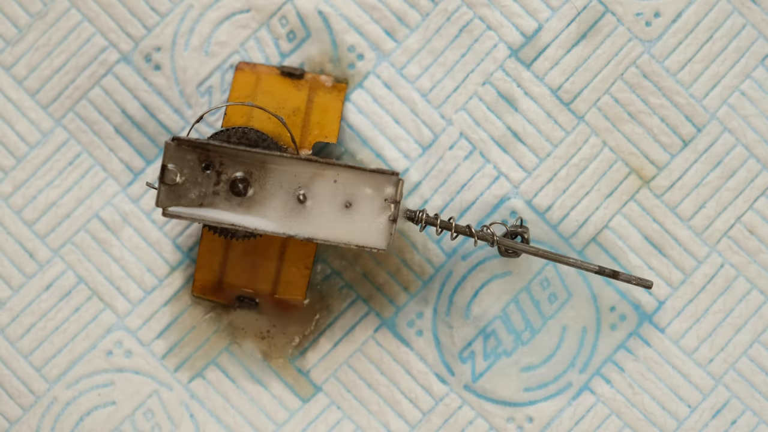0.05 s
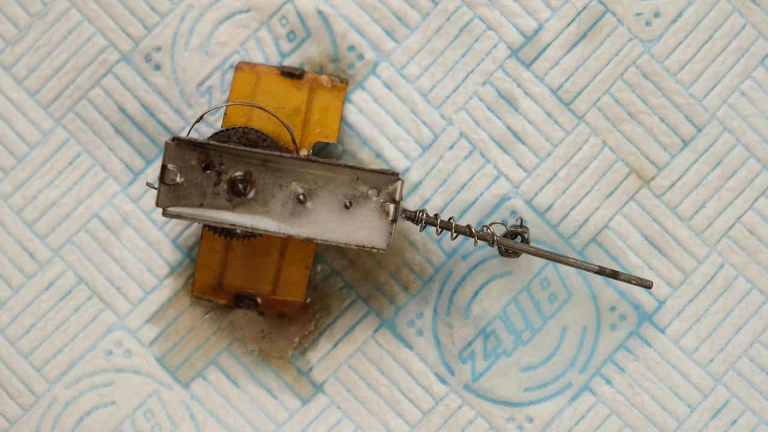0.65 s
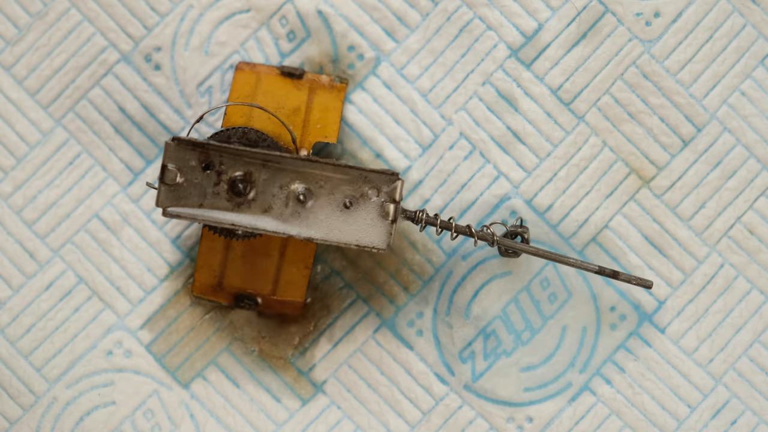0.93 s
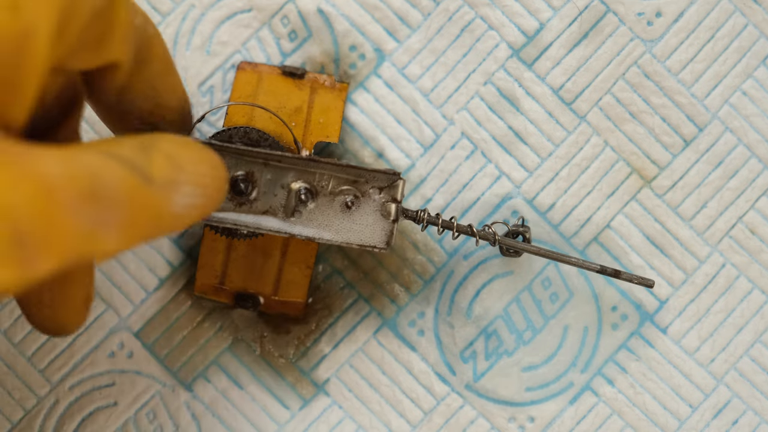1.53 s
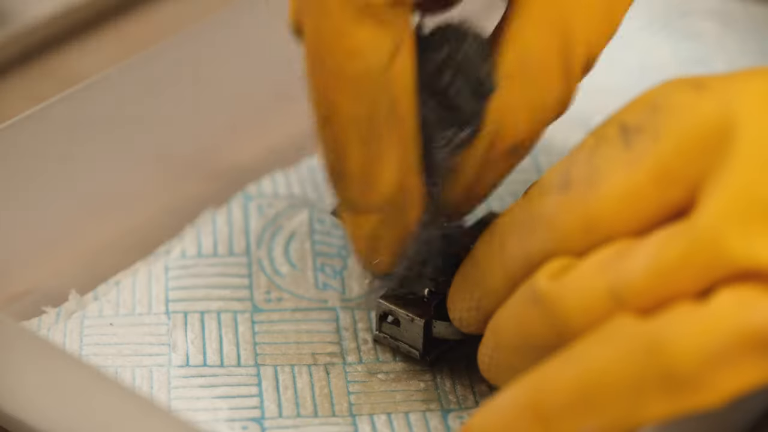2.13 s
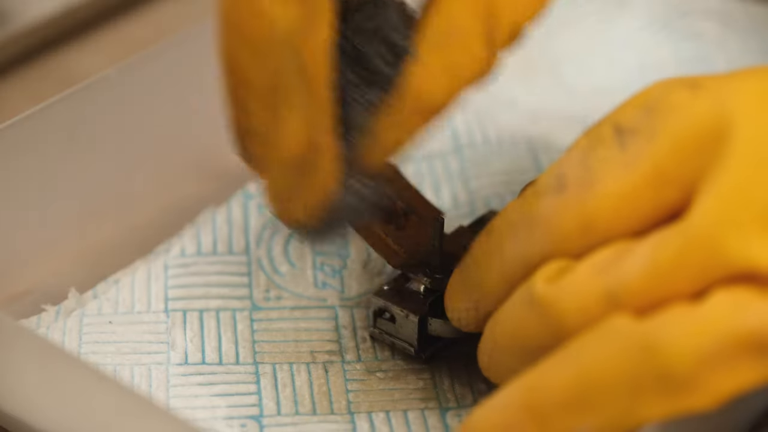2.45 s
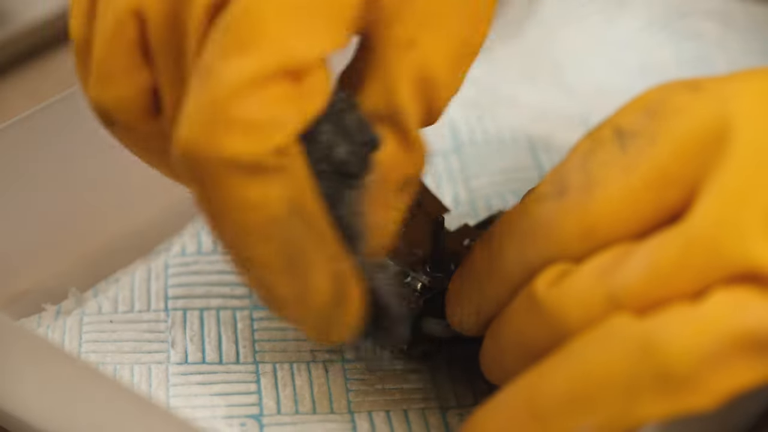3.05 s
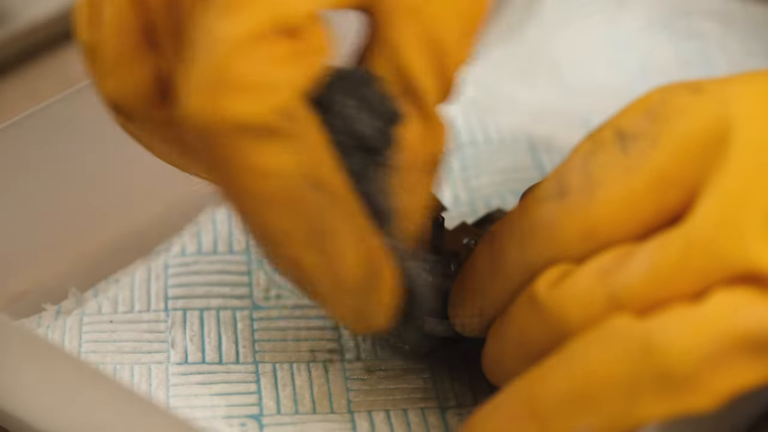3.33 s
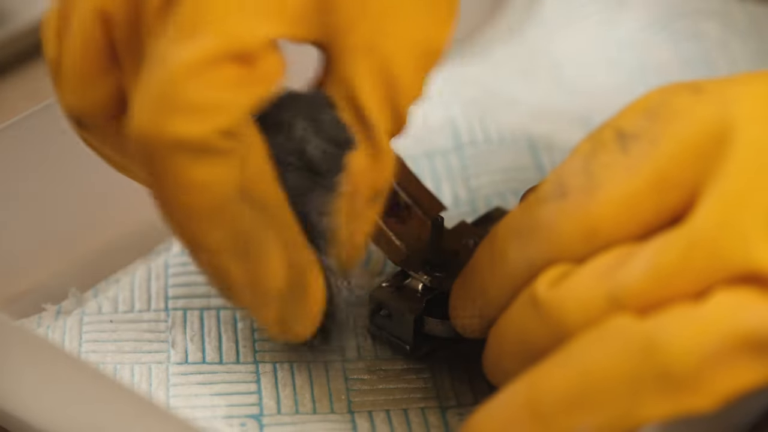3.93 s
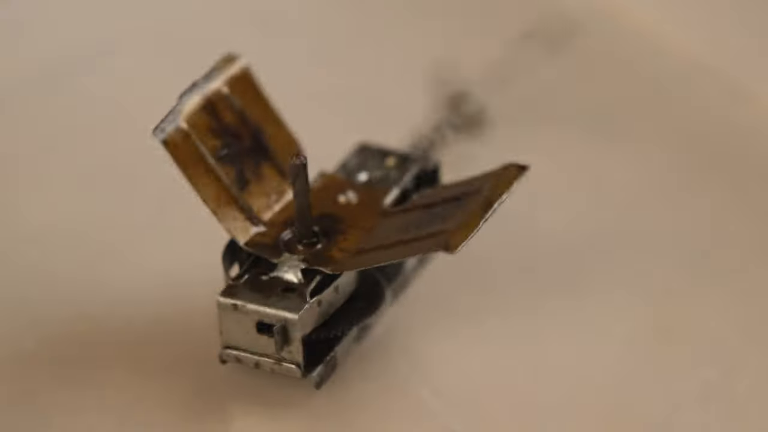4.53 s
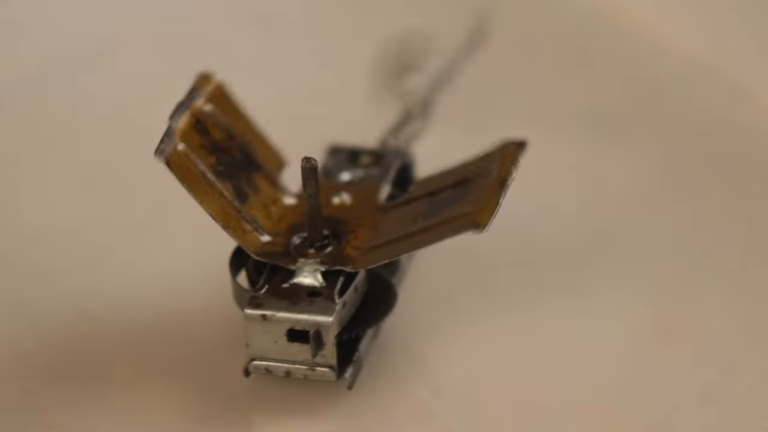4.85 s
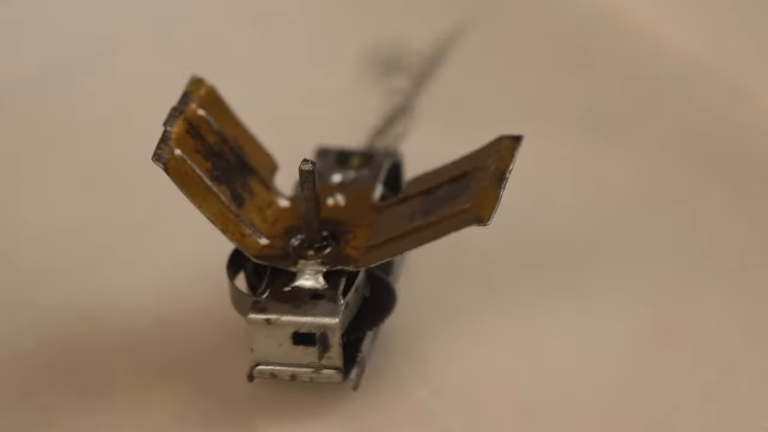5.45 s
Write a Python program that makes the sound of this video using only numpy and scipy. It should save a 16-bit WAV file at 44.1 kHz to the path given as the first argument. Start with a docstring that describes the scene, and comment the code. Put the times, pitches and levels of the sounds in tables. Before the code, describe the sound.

Steel wool scrubs a small tin toy in even strokes, then its clockwork motor whirrs and its wings flap with rapid metallic snaps.

```python
"""A small tin clockwork toy on a workbench, close to the microphone in a quiet, dry room.
First, over faint room tone, rubber gloves brush the paper mat. From 1.7 s, with a low hum underneath,
steel wool rubs a wing in even strokes; now and then a strand snags the edge and plucks the tin.
At 4.5 s the spring motor is let go: the gears whirr and the wings flap to the end,
each flap a sharp snap that rings the frame, then a softer return knock."""
import sys
import numpy as np
from scipy import signal
from scipy.fft import rfft, irfft, next_fast_len
from scipy.io import wavfile
from scipy.ndimage import uniform_filter1d

SR = 44100
rng = np.random.default_rng(int(sys.argv[2]) if len(sys.argv) > 2 else 0)


def wrap_up_sound(samples):
    """Save the sound to the file named by the first command line argument, as 16-bit audio."""
    columns = np.atleast_2d(samples).T
    # keep every value between -1 and 1, then stretch to whole-number steps
    tamed = np.clip(columns, -1, 1)
    steps = np.round(tamed * 32767).astype(np.int16)
    wavfile.write(sys.argv[1], SR, steps)


N = 246078
T = np.arange(N) / SR
HOLD_S = (1.69, 4.52)  # the toy is held and scrubbed: from, to


def undb(db):
    """Decibels to gain."""
    return np.exp(np.asarray(db) * np.log(10) / 20)


def unit(x):
    """Scale to rms 1."""
    return x / np.sqrt(np.mean(x ** 2))


def curve(rows):
    """Gain over time from (time_s, level_db) rows."""
    return undb(np.interp(T, *np.transpose(rows)))


def between(start, end):
    """1 from start to end, with soft edges."""
    return uniform_filter1d(1. * ((T > start) & (T < end)), SR // 100)


def colour(x, points):
    """Filter by a (frequency_hz, level_db) spectrum, keeping the power of white noise."""
    hz, db = np.transpose(points)
    size = next_fast_len(N + SR // 10, real=True)
    gain = undb(np.interp(np.log(np.fft.rfftfreq(size, 1 / SR) + 1), np.log(hz), db))
    return irfft(rfft(x, size) * unit(gain), size)[:N]


def band(x, hz, width):
    """One resonance, gain 1 at its centre."""
    return signal.lfilter(*signal.iirpeak(min(hz, .45 * SR), hz / width, fs=SR), x)


def steep_band(x, hz, width):
    """The same resonance twice, for steeper sides."""
    return band(band(x, hz, width), hz, width)


def blows(rows):
    """One impulse for each (time_s, level_db) row."""
    force = np.zeros(N)
    for s, db in rows:
        force[min(int(s * SR), N - 1)] += undb(db)
    return force


def fade(force, decay_s):
    """Envelope that jumps at each blow and dies away exponentially."""
    return signal.lfilter([1], [1, -np.exp(-1 / (decay_s * SR))], force)


def grains(rate, spread_db):
    """Dense tiny contacts of uneven size, rms 1."""
    contacts = (rng.random(N) < rate / SR) * rng.choice([-1, 1], N)
    sizes = undb(spread_db * np.minimum(rng.exponential(size=N), 5))
    return unit(contacts * sizes)


def wander(rate):
    """Smooth random drift, rms 1."""
    step = int(SR / rate)
    stairs = np.repeat(rng.standard_normal(N // step + 1), step)
    return unit(uniform_filter1d(stairs, step)[:N])


def swell(peak_s, rise_s, fall_s):
    """Pressure of a hand stroke: it builds up to peak_s and lifts off."""
    out, near = np.zeros(N), np.abs(T - peak_s) < .5
    t = T[near] - peak_s
    out[near] = np.exp(-(t / np.where(t < 0, rise_s, fall_s)) ** 2 / 2)
    return out


def ring(modes, scatter_db, detune):
    """Sheet metal after one blow; neighbouring modes swing in opposite directions."""
    hz, width, db = np.transpose(modes)[:, :, None]
    t = T[:SR // 30]
    pitch_draw, level_draw = rng.standard_normal((2, len(hz), 1))
    sign = (-1) ** np.arange(len(hz))[:, None]
    envelopes = undb(db + scatter_db * level_draw) * np.exp(-np.pi * width * t)
    waves = sign * np.sin(2 * np.pi * hz * (1 + detune * pitch_draw) * t)
    return (envelopes * waves).sum(0) / np.sqrt(np.sum(undb(2 * db)))


def strikes(rows, modes, clean_db, bounce_db, bounce_s, scatter_db, detune):
    """Each (time_s, level_db) blow is a push and a flurry of tiny bounces, on a slightly new spot."""
    out, t = np.zeros(N + SR), T[:SR // 100]
    for s, db in rows:
        force = undb(bounce_db) * np.exp(-t / bounce_s) * rng.standard_normal(len(t))
        force[0] = undb(clean_db)
        hit = undb(db) * np.convolve(force, ring(modes, scatter_db, detune))
        start = int(s * SR)
        out[start:start + len(hit)] += hit
    return out[:N]


# room tone around the bench: frequency_hz, level_db
ROOM_SPECTRUM = [(18, -9.5), (45, 3), (80, -6.5), (150, -6.5), (270, -8.5), (420, -17.5), (700, -19),
                 (1400, -26), (2800, -24.5), (7500, -26.5), (10000, -23.5), (15500, -26.5)]
# tilt of the room tone in the side channel: frequency_hz, offset_db
SIDE_TILT = [(60, -8), (110, -12), (200, -18), (380, -8), (700, -4), (2400, -1.5), (15000, -2.5)]
# low hum while the toy is held: time_s, level_db
HUM_LEVELS = [(1.85, -61), (2.1, -70), (2.75, -59.5), (3.4, -60.5), (3.75, -64), (4.5, -62)]

def room(tone_db=-61, hum_hz=53.6):
    """Low rumble and faint hiss, wider in the treble, with a wavering hum for a while."""
    hz, db = np.transpose(ROOM_SPECTRUM)
    tilt_hz, tilt_db = np.transpose(SIDE_TILT)
    side_db = db + np.interp(np.log(hz), np.log(tilt_hz), tilt_db)
    mid = unit(colour(rng.standard_normal(N), ROOM_SPECTRUM))
    side = undb(-7.5) * unit(colour(rng.standard_normal(N), np.transpose([hz, side_db])))
    phase = 2 * np.pi * np.cumsum(hum_hz + 2.57 * wander(rate=16)) / SR
    hum = unit(np.sin(phase)) * undb(1.1 * wander(rate=14))
    tone = undb(tone_db) * np.array([mid + side, mid - side])
    return tone + between(*HOLD_S) * curve(HUM_LEVELS) * hum


# a glove lands on the mat: peak_s, level_db, length_s, thud_db, thud_hz
GLOVE_LANDINGS = [(.085, -70, 0.024, 0, 246), (0.901, -52.5, 0.0073, 3, 305),
                  (1.255, -54.5, .01, -4.5, 910), (4.275, -74, .007, 12, 300),
                  (4.491, -67, 0.012, 12.5, 420)]
# rustle of the gloves shifting their grip: time_s, level_db
GRIP_RUSTLE = [(0, -71), (.7, -82), (1, -65.5), (1.33, -61.5), (1.58, -72.5), (1.75, -60), (2.3, -64.5),
               (2.87, -63.5), (3.12, -57.5), (3.55, -69.5), (4.5, -71)]
# rubber on paper, heard close: frequency_hz, level_db
GLOVE_SPECTRUM = [(150, 2), (340, 0.5), (550, -4), (1000, -3.5), (1450, -2.5), (2000, -4.5), (2800, -5),
                  (5000, -8), (10000, -10.5), (15000, -16.5)]

def gloves(slide_lead_s=0.025, slide_s=0.028, slide_db=-8.5):
    """Rubber slides on the paper mat with a hollow note and lands with a soft thud."""
    touch, thuds, push = 0, 0, rng.standard_normal(N)
    for s, db, length, thud_db, thud_hz in GLOVE_LANDINGS:
        pressure = undb(db) * swell(s, length, length)
        slide = undb(db + slide_db) * swell(s - slide_lead_s, slide_s, slide_s)
        touch += pressure + slide
        thuds += undb(thud_db) * pressure * unit(steep_band(push, thud_hz, width=0.63 * thud_hz))
    hollow = undb(-3.5) * unit(steep_band(push, hz=1415, width=160))
    rustle = colour(grains(rate=18000, spread_db=2.3), GLOVE_SPECTRUM)
    return (curve(GRIP_RUSTLE) + touch) * rustle + touch * hollow + thuds


# steel wool strokes along the wing: peak_s, level_db, rise_s, wing_db, wing_hz
WOOL_STROKES = [(1.94, -54.5, 0.029, -5, 7600), (2.212, -49.5, 0.04, -2, 4320),
                (2.457, -44, 0.018, -3, 4280), (2.72, -56.5, 0.078, -7, 4250),
                (2.785, -49, 0.013, 4.5, 7200), (3.018, -46, 0.028, -.5, 7260),
                (3.253, -47.5, .022, 4, 7380), (3.48, -48.5, 0.028, 3, 7280),
                (3.703, -49.5, .022, -1, 7060), (3.928, -47, .018, -1.5, 7250),
                (4.143, -48.5, 0.024, -4.5, 7100), (4.342, -48, 0.022, -3, 7200)]
# steel wool on tin, heard close: frequency_hz, level_db
WOOL_SPECTRUM = [(300, -16), (700, -5), (1200, -1), (1800, -6), (2400, -1.5), (4200, 0.5), (6000, -1),
                 (9000, 1), (10700, -3), (12000, -2), (13500, -1.5), (15200, 3.5)]
# ring of the held wing: pitch_hz, width_hz, level_db
WING_MODES = [(3990, 520, -3), (5230, 570, -8.5), (7220, 173, -2.5), (7620, 220, -0.5), (9230, 155, -9),
              (10800, 500, -10.5), (14600, 1200, -19)]

def scrubbing(sing_lag_s=0.0076, tick_lag_s=0.01, land_lead_s=0.054, land_s=0.017):
    """Strands scratch the tin; late in a stroke the wing sings and single strands pluck it."""
    pressure = undb(-71.5) * between(*HOLD_S)  # the wool rests on the toy between strokes
    sing, lifting = 0, 0
    strands = grains(rate=7000, spread_db=3.5)
    for s, db, rise, wing_db, wing_hz in WOOL_STROKES:
        fall = 0.74 * rise
        landing = undb(-10.5) * swell(s - land_lead_s, land_s, land_s)
        pressure += undb(db) * (swell(s, rise, fall) + landing)
        width = 1500 * (wing_hz / 7200) ** 2  # the wool damps higher modes more
        wing = unit(steep_band(strands, wing_hz, width))  # pitch is set by where the wing is pressed
        sing += undb(db + wing_db) * swell(s + sing_lag_s, rise, fall) * wing
        lifting += undb(db) * swell(s + tick_lag_s, fall, fall)
    scratch = colour(grains(rate=12000, spread_db=2.0), WOOL_SPECTRUM)
    scratch += undb(-10) * unit(wheels(strands))  # it reaches the wheels through the frame
    plucks = grains(rate=380, spread_db=2.5)
    ticks = unit(signal.oaconvolve(plucks, ring(WING_MODES, scatter_db=4, detune=0.012))[:N])
    flicker = undb(2.3 * wander(rate=220) - 1)
    return (pressure * scratch + sing) * flicker + undb(-8) * lifting * ticks


# a strand catches the wing's edge and lets go: start_s, level_db, slip_s
EDGE_SNAGS = [(1.708, -31, 0.0025), (1.869, -33, 0.0017), (2.186, -37, .002), (2.2242, -8, 0.0011),
              (2.232, -19, 0.0029), (2.2503, -21.5, 0.0015), (2.383, -31, 0.0017), (2.462, -34.5, .004),
              (2.751, -31.5, .0023), (2.785, -33, .004), (3.264, -31, .003), (3.476, -27.5, 0.0022),
              (3.734, -32, 0.0042), (3.938, -31.5, 0.0024), (4.168, -41, 0.0026), (4.374, -34.5, .003)]

def snagging(clean_s=0.00074):
    """A strand slips off the edge with a short rasp that rings the wing and nudges the toy on its mat."""
    rasp = sum(fade(blows([(s, db)]), slip_s) for s, db, slip_s in EDGE_SNAGS) * rng.standard_normal(N)
    # the quicker the slip, the more of it is one clean pluck
    pluck = blows([(s, db + 20 * np.log10(clean_s / slip_s)) for s, db, slip_s in EDGE_SNAGS])
    force = undb(2) * pluck + undb(-19.5) * rasp
    edge = signal.oaconvolve(force, ring(WING_MODES, scatter_db=0, detune=0))[:N]
    slips = blows([row[:2] for row in EDGE_SNAGS])
    tail = fade(slips, decay_s=0.052) * unit(band(rng.standard_normal(N), hz=7560, width=380))
    nudge = fade(slips, decay_s=0.014) * unit(steep_band(rng.standard_normal(N), hz=110, width=130))
    return edge + undb(-15) * colour(rasp, WOOL_SPECTRUM) + undb(-44) * tail + undb(-40.5) * nudge


# ring of the wheels and spindles: pitch_hz, width_hz, level_db
WHEEL_MODES = [(194.5, 45, -3), (652, 41, -6.5), (1200, 24, 0), (1530, 19, 1), (1652, 13, 1),
               (2170, 85, -7), (2460, 34, 3), (2665, 18, 0), (3000, 26, 3.5), (3300, 14, 0),
               (4010, 100, -7), (4100, 27, 3), (4490, 76, 6), (4950, 35, 5.5), (5900, 22, -15),
               (5960, 71, -3), (6780, 120, 0), (7510, 49, 7.5), (8400, 83, 6), (9200, 120, 2),
               (9540, 35, 0), (10200, 70, 3), (12000, 370, -13), (14600, 270, -7)]

def wheels(drive):
    """Wheels and spindles ring at their own pitches when shaken."""
    return sum(undb(db) * band(drive, hz, width) for hz, width, db in WHEEL_MODES)


# tooth on tooth, heard close: frequency_hz, level_db
TOOTH_SPECTRUM = [(100, -34), (200, -3), (450, -8.5), (900, -6.5), (1500, -0.5), (3000, -3.5), (9000, 2),
                  (13000, -1.5), (15500, -0.5)]
# load on the gear train, which sets the whirr and the return knocks: time_s, load_db
GEAR_LOAD = [(4.53, 0), (4.76, -2.5), (4.81, 0), (5.14, 3), (5.18, -6.5), (5.25, -9), (5.29, 4), (5.39, -4),
             (5.5, 3.5), (5.58, -6)]
RELEASE_S = 4.5249  # the spring is let go

def gears(skip_lead_s=0.011, skip_spread_s=0.002):
    """Teeth tick unevenly and skip before each snap; the ticks and each flap's jolt ring the wheels."""
    snaps, knocks = flap_blows()
    teeth = grains(rate=8000, spread_db=2.0) * undb(2 * wander(rate=260))
    jolt = undb(-29) * fade(blows(snaps + knocks), decay_s=0.0017) * rng.standard_normal(N)
    # each knock shakes the gears and swells the whirr
    surge = 1 + 0.64 * fade(blows([(s, 0) for s, db in knocks]), decay_s=0.014)
    load = undb(-40) * curve(GEAR_LOAD) * surge * (T > RELEASE_S)
    whirr = wheels(load * teeth + jolt)
    contact = load * grains(rate=9000, spread_db=3.0) * undb(2 * wander(rate=300))
    chance = rng.standard_normal((len(snaps), 2))
    slips = [(s - skip_lead_s + skip_spread_s * late, -29 + 2 * hard)
             for (s, db), (late, hard) in zip(snaps, chance)]
    skips = undb(-12) * fade(blows(slips), decay_s=0.0011) * rng.standard_normal(N)
    return undb(5.5) * whirr + colour(undb(-1.5) * contact + skips, TOOTH_SPECTRUM)


# wing beats right in front of the microphone: snap_s, level_db, knock_delay_s
WING_FLAPS = [(4.5644, -5, 0.018), (4.6189, -3.5, 0.016), (4.6711, -4, 0.017), (4.7291, -4.5, 0.019),
              (4.785, -6.5, 0.015), (4.8382, -4.5, .0179), (4.8963, -3.5, .0165), (4.9458, -4, 0.018),
              (4.9995, -4.5, 0.017), (5.0533, -4, 0.017), (5.1084, -4.5, 0.02), (5.1795, -1.5, .018),
              (5.234, -6, .02), (5.2808, -7, 0.017), (5.3319, -3, .019), (5.3977, -5, .019),
              (5.4483, -6, 0.018), (5.5019, -1.5, 0.019), (5.5616, -4.5, .018)]

def flap_blows():
    """(time_s, level_db) rows of snaps and knocks; under more load the linkage knocks back harder."""
    snaps = [(s, db) for s, db, delay in WING_FLAPS]
    returns = [s + delay for s, db, delay in WING_FLAPS]
    knocks = [(s, -9.5 + 0.58 * np.interp(s, *np.transpose(GEAR_LOAD))) for s in returns]
    release = (RELEASE_S, -17)  # the spring takes up the play with a knock
    return snaps, [release] + knocks


# ring of the tin frame: pitch_hz, width_hz, level_db
FRAME_MODES = [(634, 54, -45.5), (880, 106, -39), (1196, 27.5, -37), (1430, 320, -17.5), (1620, 290, -15.5),
               (2120, 720, -30.5), (2459, 115, -15), (3100, 345, -10), (3510, 400, -14.5),
               (4190, 71, -26.5), (4555, 136, -19.5), (5240, 360, -16.5), (5630, 134, -20),
               (6500, 190, -14.5), (7240, 290, -18.5), (7860, 510, -12), (8570, 470, -12.5),
               (9550, 560, -11.5), (10400, 1050, -9.5), (11970, 580, -8.5), (14700, 510, -11.5)]
# loose joints chattering after a blow: frequency_hz, level_db
CHATTER_SPECTRUM = [(100, -47), (300, -12.5), (500, -19), (1050, -10), (1250, -3), (1500, 3), (2400, 1),
                    (3600, -2), (6000, -7), (9000, -2), (12500, -9.5), (15500, -5.5)]

def flapping(delay_s=0.000815):
    """A snap rings the frame; the return knock bounces and thumps the bench; joints chatter after both."""
    snap_rows, knock_rows = flap_blows()
    snaps, knocks = blows(snap_rows), blows(knock_rows)
    frame = strikes(snap_rows, FRAME_MODES, clean_db=0.5, bounce_db=-28, bounce_s=0.00052,
                    scatter_db=1.5, detune=0.0059)
    frame += strikes(knock_rows, FRAME_MODES, clean_db=-6.5, bounce_db=-24, bounce_s=0.0011,
                     scatter_db=1.0, detune=0.015)
    # thin tin radiates no bass
    frame = signal.sosfilt(signal.butter(2, 350, "high", fs=SR, output="sos"), frame)
    crack = undb(-25.5) * fade(snaps, decay_s=0.0014) + undb(-11.5) * fade(knocks, decay_s=0.0017)
    tail = undb(-21.5) * fade(snaps, decay_s=0.0085) + undb(-22) * fade(knocks, decay_s=0.0087)
    chatter = colour((crack + tail) * grains(rate=20000, spread_db=-1.0), CHATTER_SPECTRUM)
    thump = steep_band(fade(knocks, decay_s=0.0035) * rng.standard_normal(N), hz=740, width=410)
    # snaps and knocks sound just under a millisecond after their listed times
    return np.interp(T - delay_s, T, frame + chatter + undb(-7.5) * thump)


def scene():
    """Toy and hands are close and straight ahead of the microphone; only the room tone has width."""
    return flapping() + gears() + scrubbing() + snagging() + gloves() + room()


def record(dry):
    """The recorder cuts the treble above 15.8 kHz."""
    return signal.sosfilt(signal.ellip(10, .2, 70, 15800, fs=SR, output="sos"), dry)


dry = scene()
out = record(dry)
wrap_up_sound(out)
```